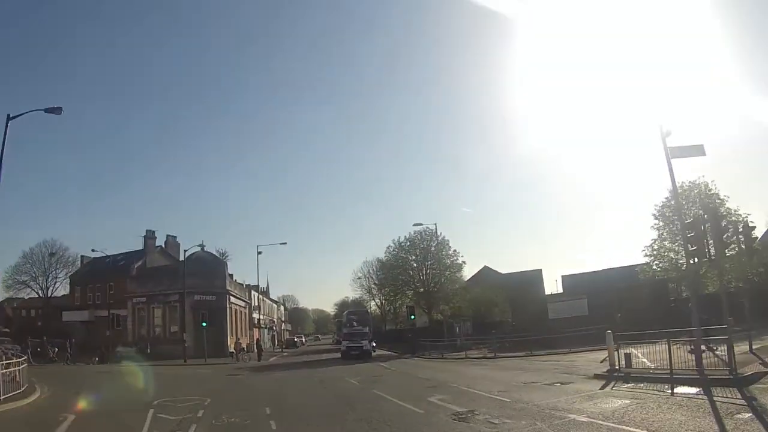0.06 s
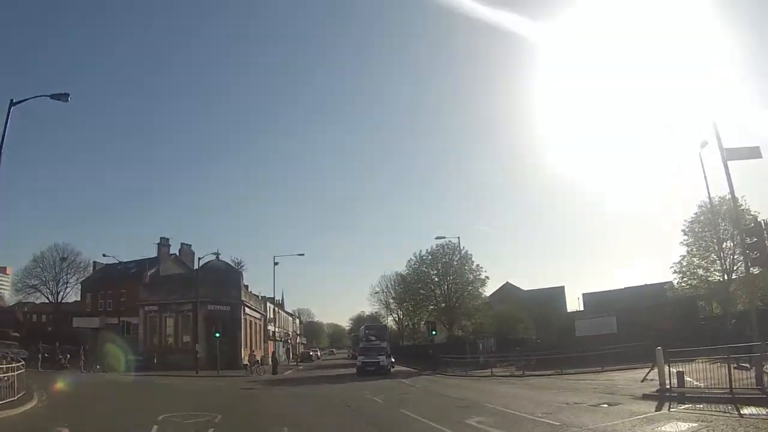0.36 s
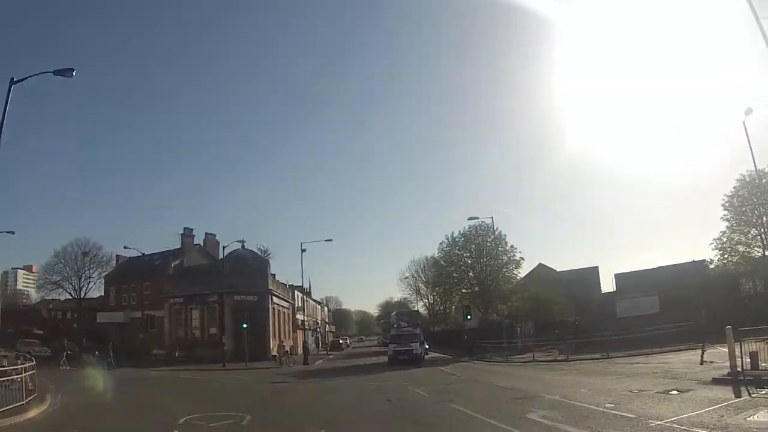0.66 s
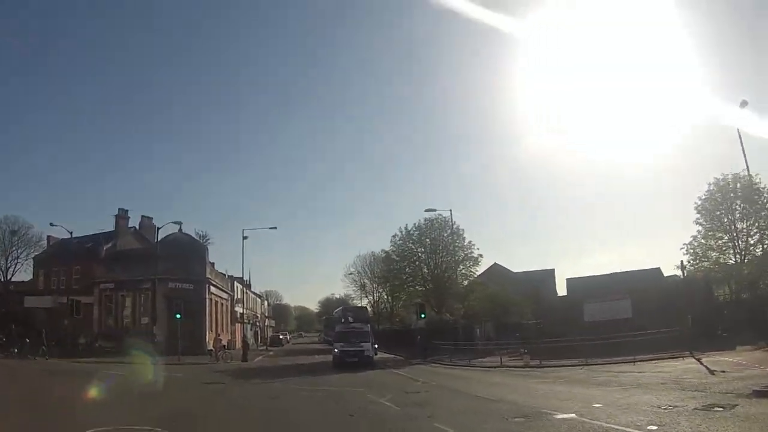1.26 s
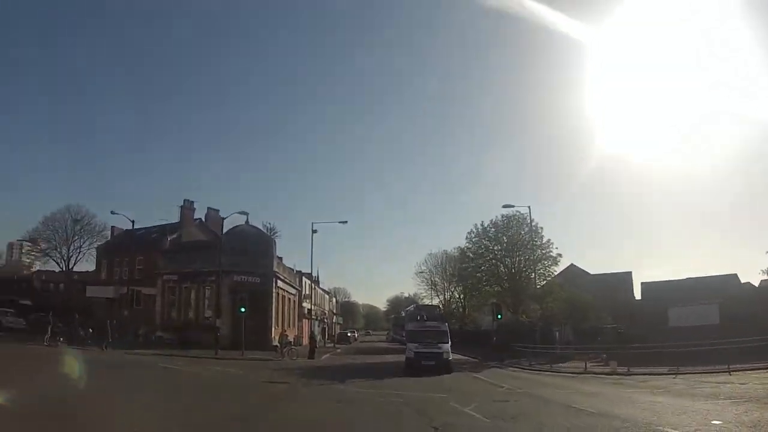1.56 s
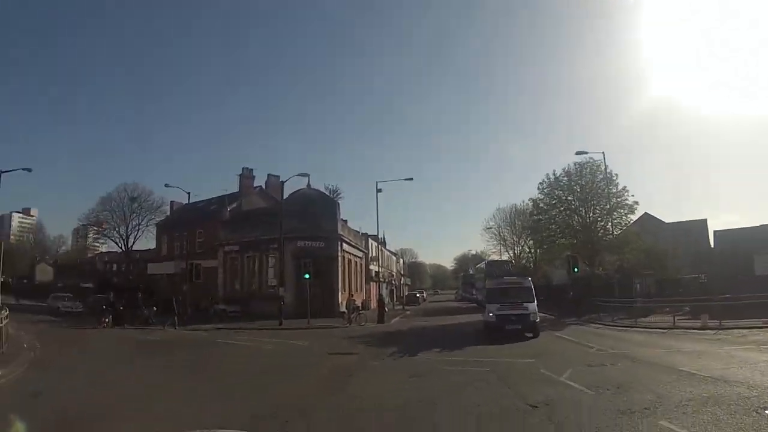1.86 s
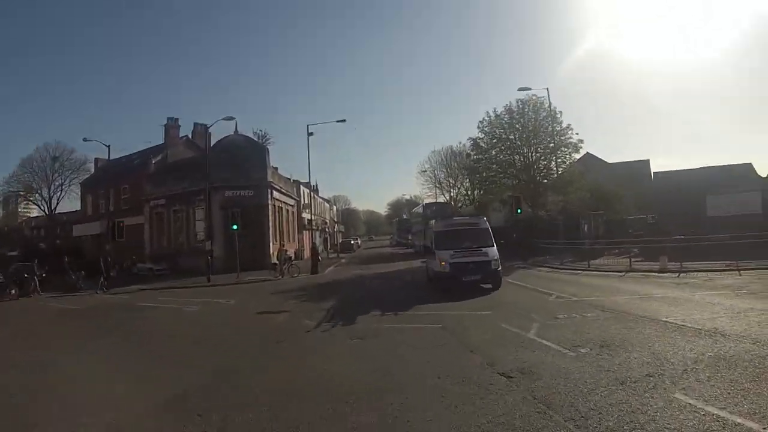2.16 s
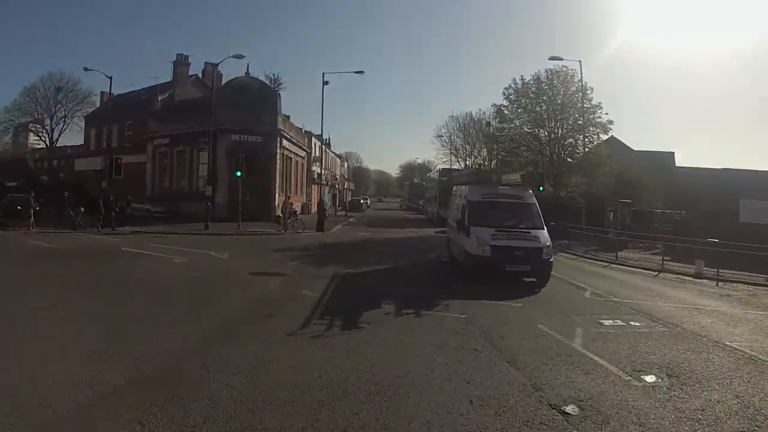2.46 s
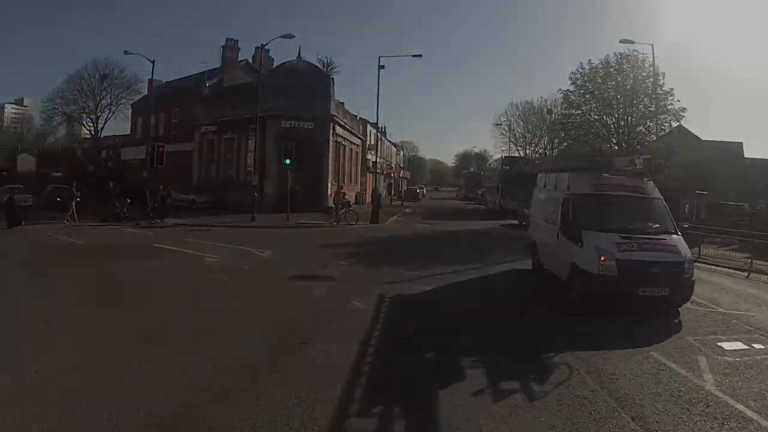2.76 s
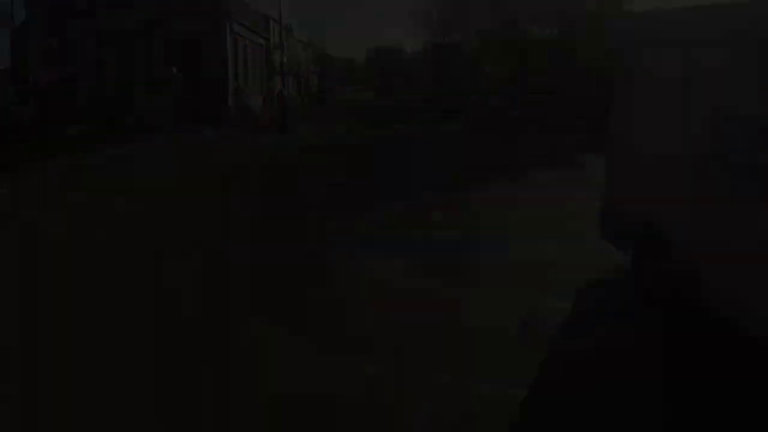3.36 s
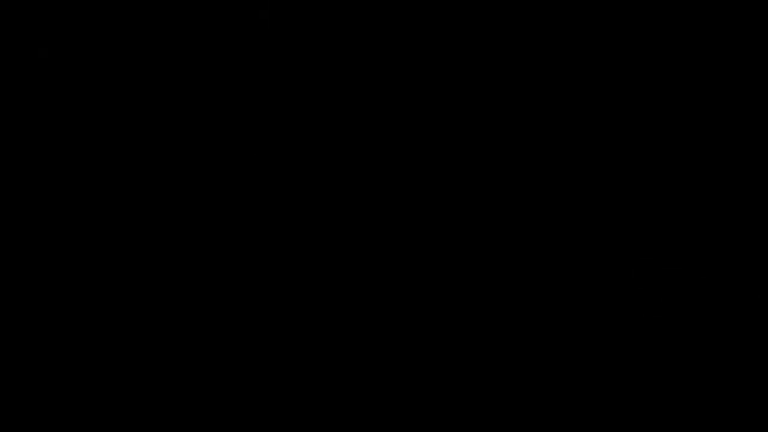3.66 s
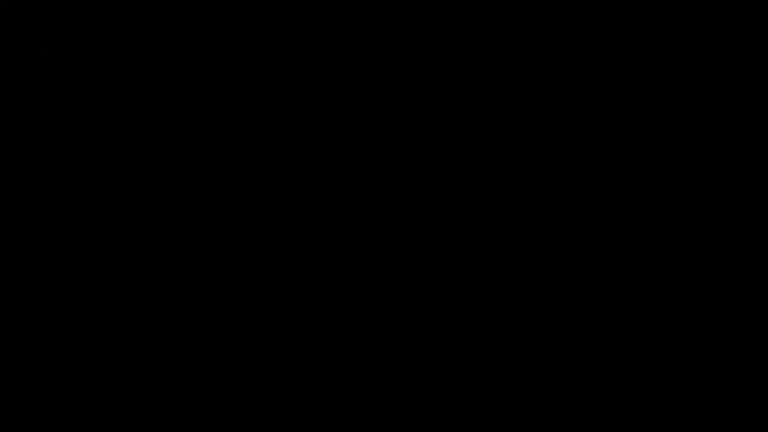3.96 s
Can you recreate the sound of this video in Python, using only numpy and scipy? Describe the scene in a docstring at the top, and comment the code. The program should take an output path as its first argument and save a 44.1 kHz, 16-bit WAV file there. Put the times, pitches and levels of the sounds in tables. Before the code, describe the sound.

Tyre roar and low wind buffeting run throughout, heard from a moving bicycle in city traffic. A nearby engine drones until about 1 second. Loose parts rattle around 0.4 and 0.6 seconds, then click and ping lightly. A brake squeaks faintly at 2 seconds and the wind grows gustier. An approaching van adds a faint rasp as everything fades from 2.7 seconds to silence at 3.6.

```python
"""Bicycle crossing a city junction

Heard from a cased camera on the bike. A nearby engine drones at its firing rate and overtones, then drops away.
Tyres roar and hiss on the asphalt, wind buffets the case, loose parts rattle and ping over the bumps, and a
brake squeaks faintly. A van comes alongside, and over the last second the whole sound fades to silence."""
import sys
import numpy as np
from scipy import signal
from scipy.fft import rfft, irfft, next_fast_len
from scipy.io import wavfile
from scipy.ndimage import uniform_filter1d, map_coordinates

SR = 44100
rng = np.random.default_rng(int(sys.argv[2]) if len(sys.argv) > 2 else 0)


def unload_wav(signal):
    """Save mono or channel-first audio to the path in sys.argv[1] as 16-bit WAV at rate SR, clipped to [-1, 1]."""
    wavfile.write(
        sys.argv[1],
        SR,
        np.round(np.clip(np.atleast_2d(signal).T, -1, 1) * 32767).astype(np.int16),
    )


N = 176400


def amp(db):
    """Decibels to gain."""
    return 10 ** (np.asarray(db) / 20)


def unit(x):
    """Scale to rms 1."""
    return x / np.sqrt(np.mean(x ** 2) + 1e-20)


def curves(rows):
    """One value per sample for each column after the time."""
    times_s, *columns = np.transpose(rows)
    return [np.interp(np.arange(N) / SR, times_s, column) for column in columns]


def wobble(rate_hz):
    """Smooth random curve, rate_hz knots a second."""
    knots = rng.standard_normal(int(N * rate_hz / SR) + 4)
    return map_coordinates(knots, [np.arange(N) * rate_hz / SR])


def filtered(x, response):
    """Zero-phase filter with gain response(hz)."""
    size = next_fast_len(N + SR // 2)
    return irfft(rfft(x, size) * response(np.fft.rfftfreq(size, 1 / SR)), size)[:N]


def rush(spectrum, patchy_db):
    """Coloured noise of rms 1 with patches of random gain in time and frequency."""
    cells = signal.stft(rng.standard_normal(N), nperseg=512)[2]
    patches = uniform_filter1d(rng.standard_normal(cells.shape), size=6, axis=0)
    patches = uniform_filter1d(patches, size=12, axis=1)
    noise = signal.istft(cells * amp(patchy_db * unit(patches)), nperseg=512)[1][:N]
    knots_hz, db = np.transpose(spectrum)
    return unit(filtered(noise, lambda hz: amp(np.interp(np.log(hz + 1), np.log(knots_hz), db))))


def struck(start_s, t60_s, attack_s):
    """Contact envelope: fast rise, exponential decay."""
    age_s = np.maximum(np.arange(N) / SR - start_s, 0)
    return (1 - np.exp(-age_s / attack_s)) * amp(-60 * age_s / t60_s)


def bursts(rows, width_oct, t60_s, attack_s):
    """Decaying noise bursts, each in a band around its own centre."""
    out = np.zeros(N)
    for start_s, db, centre_hz in rows:
        noise = rng.standard_normal(N)
        band = filtered(noise, lambda hz: np.exp(-.5 * (np.log2((hz + 1) / centre_hz) / width_oct) ** 2))
        out += amp(db) * unit(band) * struck(start_s, t60_s, attack_s)
    return out


def brake_squeak(start_s=2.04, length_s=.1, pitch_hz=4430, level_db=-53):
    """A brake sings briefly on one note."""
    t = np.arange(N) / SR
    progress = np.clip((t - start_s) / length_s, 0, 1)
    swell = np.sqrt(np.abs(np.sin(np.pi * progress)))
    return amp(level_db) * swell * np.sin(2 * np.pi * pitch_hz * t + .3 * wobble(95))


def tyre_hiss():
    """Gritty hiss of rubber on asphalt, with a higher fizz."""
    # Each row: time in seconds, hiss in dB, fizz in dB.
    levels = [(0, -55, -55.5), (.3, -56, -57), (.6, -54.5, -62), (1.03, -56.5, -68), (1.25, -55, -67),
              (1.55, -52, -71), (1.9, -52.5, -60), (2.2, -54, -66.5), (2.55, -57, -67), (2.8, -58.5, -64.5),
              (3.05, -61, -73), (3.5, -59, -67)]
    # Each row: frequency in Hz, relative density in dB.
    hiss_spectrum = [(3000, -31.5), (4300, -0.5), (4800, -6), (5200, 1), (5700, -1.5), (6300, -7.5),
                     (7000, -9.5), (7800, -12), (10000, -28), (13000, -32.5), (15000, -54)]
    fizz_spectrum = [(5000, -24.5), (6300, -10.5), (6800, 3.5), (7400, -8.5), (8250, 1), (9100, -6.5),
                     (10000, -7.5), (11100, -15.5), (12200, -8), (13200, -25), (14500, -35.5)]
    hiss_db, fizz_db = curves(levels)
    grit = amp(.78 * wobble(150))
    hiss = amp(hiss_db) * rush(hiss_spectrum, patchy_db=1.2)
    fizz = amp(fizz_db) * rush(fizz_spectrum, patchy_db=1.2)
    return grit * (hiss + fizz)


def van():
    """An approaching van: a rasp and, once alongside, a thin hiss."""
    # Each row: time in seconds, rasp in dB, hiss in dB.
    levels = [(0, -75, -95), (1.5, -49, -85), (2.1, -49.5, -108), (2.55, -50, -79), (2.67, -46.5, -78),
              (2.8, -47, -69), (3, -52, -69), (3.25, -48, -58.5), (3.6, -47.5, -64)]
    # Each row: frequency in Hz, relative density in dB.
    rasp_spectrum = [(1200, -15), (1900, 1.5), (2300, -1), (2900, 2), (3400, -4), (4100, -7), (4800, -20),
                     (5300, -10.5), (6300, -27.5), (12000, -48)]
    hiss_spectrum = [(3000, -44), (5000, -19.5), (7000, 1.5), (7700, -2.5), (8400, 1.5), (9300, -5),
                     (10300, 1.5), (11200, -6), (12500, -14.5), (14500, -45)]
    rasp_db, hiss_db = curves(levels)
    flicker = amp(1.1 * wobble(110))
    rasp = amp(rasp_db) * rush(rasp_spectrum, patchy_db=.7)
    hiss = amp(hiss_db) * rush(hiss_spectrum, patchy_db=4.1)
    return flicker * (rasp + hiss)


def loose_parts():
    """Bumps make the bike rattle and small metal parts ping, with a few thin chirps."""
    # Each row: start in seconds, level in dB, pitch or band centre in Hz.
    ping_hits = [(1.0737, -43.5, 8050), (1.0981, -51, 8100), (1.7636, -39, 8100), (1.8274, -44, 7880),
                 (1.842, -45, 8050)]
    rattle_hits = [(.3636, -25, 2300), (.365, -38.5, 4500), (.384, -45, 4800), (.607, -32.5, 2700),
                   (.6144, -33, 1900), (.7008, -45, 6240), (.8385, -45.5, 6500), (1.1444, -53.5, 7500),
                   (1.9294, -54, 7500), (2.349, -48, 6500), (2.8265, -43, 5400), (2.845, -50, 6000),
                   (3.4044, -45, 5500)]
    chirp_hits = [(1.556, -56, 13300), (1.6253, -55, 13300), (1.627, -57, 11400), (2.3482, -63, 12800),
                  (2.7652, -57, 14250), (2.7942, -54.5, 14270)]
    t = np.arange(N) / SR
    pings = np.zeros(N)
    for start_s, db, hz in ping_hits:
        ring = np.sin(2 * np.pi * hz * t + .6 * wobble(400))
        pings += amp(db) * struck(start_s, t60_s=.031, attack_s=.001037) * ring
    rattles = bursts(rattle_hits, width_oct=.45, t60_s=.04, attack_s=.0008)
    chirps = bursts(chirp_hits, width_oct=.05, t60_s=.078, attack_s=.004)
    return pings + rattles + chirps


def wind():
    """Air on the case: lumpy low buffeting, a faster flutter above it."""
    # Each row: time in seconds, buffet in dB, flutter in dB.
    levels = [(0, -26, -39.5), (.5, -28.5, -35), (.8, -23, -44.5), (1.2, -30, -34.5), (1.55, -23.5, -38),
              (1.85, -28, -35), (2.05, -21, -35), (2.22, -26, -35.5), (2.3, -18, -26), (2.36, -27.5, -31.5),
              (2.43, -20, -31), (2.53, -25.5, -33), (2.66, -22, -27), (2.9, -24, -32), (3.25, -23, -27),
              (3.6, -30, -31)]
    # Each row: frequency in Hz, relative density in dB.
    buffet_spectrum = [(10, -2.5), (22, 1), (40, 5.5), (62, 7), (95, 2.5), (125, -11), (250, -34),
                       (600, -84)]
    flutter_spectrum = [(60, -13.5), (115, 3.5), (170, 0.5), (230, -5), (320, -12), (500, -16.5),
                        (1500, -79)]
    buffet_db, flutter_db = curves(levels)
    buffet = amp(buffet_db + .37 * wobble(11)) * rush(buffet_spectrum, patchy_db=.6)
    flutter = amp(flutter_db + 1.9 * wobble(25)) * rush(flutter_spectrum, patchy_db=-.27)
    return buffet + flutter


def traffic(firing_rad):
    """Tyre roar, tread noise and a singing band, pulsing slightly with the engine."""
    # Each row: time in seconds, level in dB.
    roar_levels = [(0, -23), (.14, -26.5), (.27, -24.5), (.45, -25.5), (.7, -27.5), (1.15, -28.5),
                   (1.55, -28), (1.8, -28.5), (2.1, -28), (2.4, -30.5), (2.7, -32), (2.95, -33),
                   (3.3, -32.5), (3.6, -31.5)]
    tread_levels = [(0, -36), (.2, -32), (.36, -32.5), (.52, -35.5), (.8, -35), (1.15, -36), (1.6, -37),
                    (1.8, -39), (2.1, -40.5), (2.5, -43.5), (2.9, -45), (3.5, -45)]
    singing_levels = [(0, -30.5), (.08, -36.5), (.13, -22.5), (.2, -31.5), (.28, -36), (.6, -42),
                      (1.4, -37.5), (2.05, -34.5), (2.4, -38), (2.9, -39.5), (3.5, -38)]
    # Each row: frequency in Hz, relative density in dB.
    roar_spectrum = [(100, -26.5), (220, -6.5), (310, -1.5), (460, -6.5), (580, -2), (690, -3), (850, 0),
                     (1030, 1.5), (1180, -3), (1350, -13), (1700, -24.5), (3000, -68.5), (9000, -110)]
    tread_spectrum = [(700, -41), (1200, -2.5), (1400, -3.5), (1600, 0.5), (1850, 1), (2100, -8.5),
                      (2400, -14), (2850, -9), (3400, -16.5), (4100, -19.5), (4800, -36.5), (7000, -61),
                      (12000, -90)]
    singing_spectrum = [(300, -90), (650, -37), (800, -2.5), (900, 4), (1020, 7), (1120, -1.5),
                        (1300, -35.5), (3000, -120)]
    roar = amp(curves(roar_levels)[0] + .4 * wobble(14)) * rush(roar_spectrum, patchy_db=.12)
    tread = amp(curves(tread_levels)[0] + .4 * wobble(12)) * rush(tread_spectrum, patchy_db=.97)
    singing = amp(curves(singing_levels)[0]) * rush(singing_spectrum, patchy_db=1.6)
    return (roar + singing + tread) * (1 + .034 * np.cos(firing_rad))


def engine():
    """Exhaust drone whose overtones grow with load; also returns the firing phase."""
    # Each row: time in seconds, firing rate in Hz.
    firing_rates = [(0, 68.3), (.2, 69.34), (.45, 69.53), (.7, 72.4), (.92, 72.97), (1.1, 68.85)]
    # Each row: time in seconds, fundamental level in dB, load as overtone gain in dB.
    effort = [(0, -22, -3), (.1, -21, -5), (.2, -20, -2.5), (.34, -22.5, 1), (.5, -24.5, -9),
              (.68, -32, -11), (.78, -21.5, -16), (.92, -27, -11.5), (1.02, -46.5, 14), (1.4, -58, -13)]
    # Each row: multiple of the firing rate, dB re the fundamental at 0 dB load.
    overtones = [(2, -2), (3, -25), (4, -19), (5, -16.5), (6, -14.5), (7, -17.5), (8, -23.5)]
    firing_hz, = curves(firing_rates)
    level_db, load_db = curves(effort)
    firing_rad = 2 * np.pi * np.cumsum(firing_hz * (1 + .001 * wobble(25))) / SR
    upper = sum(amp(db + .27 * wobble(9.1)) * np.cos(round(k) * firing_rad) for k, db in overtones)
    exhaust = np.cos(firing_rad) + amp(load_db) * upper
    return -np.sqrt(2) * amp(level_db + .4 * wobble(11)) * exhaust, firing_rad


def scene():
    """All sources at one microphone."""
    drone, firing_rad = engine()
    return (drone + traffic(firing_rad) + tyre_hiss() + van() + wind() + loose_parts() + brake_squeak())[None]


def record(dry):
    """Linear fade to silence, then a brick-wall low-pass."""
    fade_start_s, fade_end_s, cutoff_hz = 2.675, 3.623, 15250
    fade = np.clip((fade_end_s - np.arange(N) / SR) / (fade_end_s - fade_start_s), 0, 1)
    return filtered(dry[0] * fade, lambda hz: hz < cutoff_hz)[None]


dry = scene()
out = record(dry)
unload_wav(out)
```